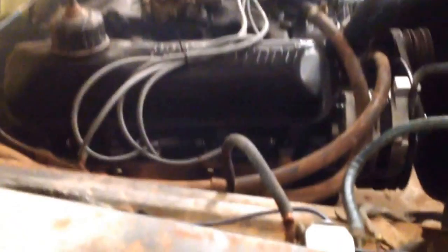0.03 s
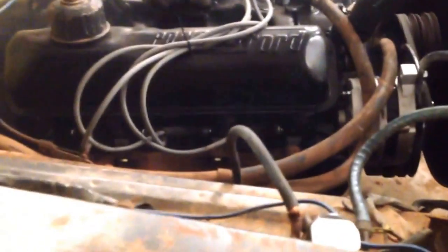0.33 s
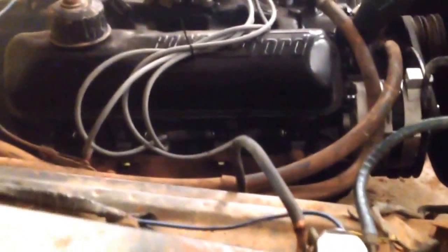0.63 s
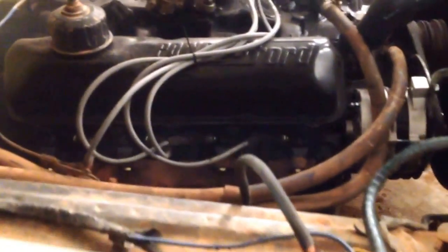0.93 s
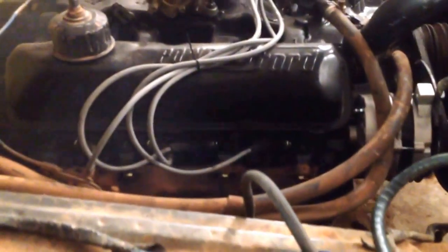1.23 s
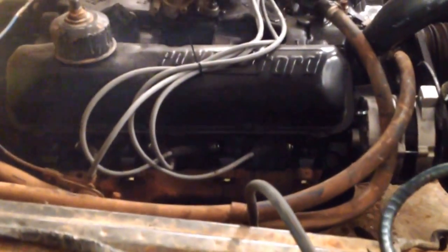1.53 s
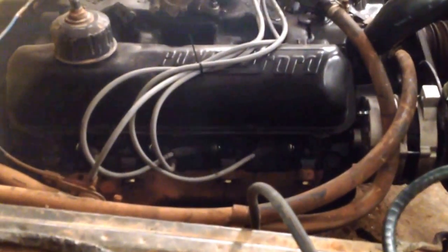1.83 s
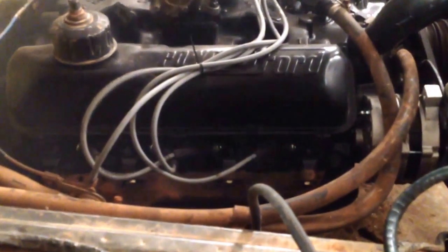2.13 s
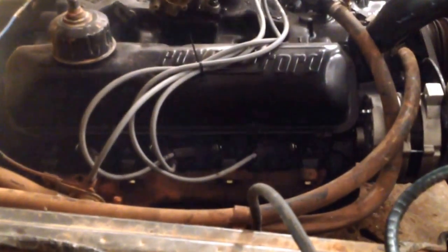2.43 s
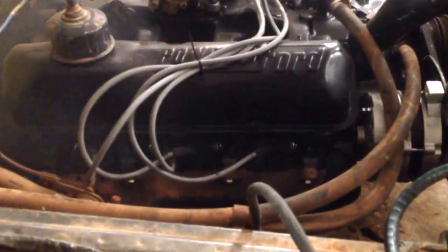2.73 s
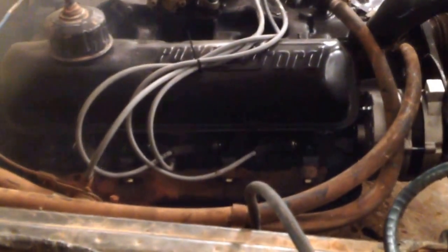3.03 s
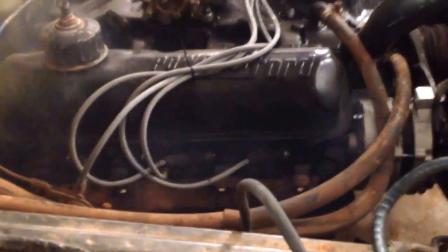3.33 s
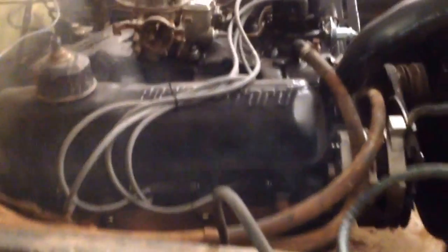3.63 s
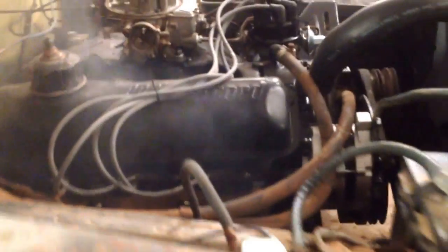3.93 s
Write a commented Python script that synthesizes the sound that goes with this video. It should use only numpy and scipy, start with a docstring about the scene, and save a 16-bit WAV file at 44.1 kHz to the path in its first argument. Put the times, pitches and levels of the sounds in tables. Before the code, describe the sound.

A petrol engine runs roughly, popping and missing, then dies, leaving a few faint knocks.

```python
"""Rough petrol engine in a workshop

One microphone, close to a truck's open engine bay. Each firing is a sharp puff of exhaust gas with
a low thud; even runs break up into single pops and misses, over the whir of fan, belts and valve gear.
The engine dies, the room rings out, and a few faint knocks follow, one on ringing metal."""
import sys
import numpy as np
from scipy import signal
from scipy.fft import rfft, irfft
from scipy.io import wavfile

SR = 44100
rng = np.random.default_rng(int(sys.argv[2]) if len(sys.argv) > 2 else 0)


def master_out(mix):
    """Clip the mix to full scale and print it as 16-bit PCM to the path in sys.argv[1]."""
    frames = np.transpose(np.atleast_2d(mix))
    ceiling = np.clip(frames, -1, 1)
    pcm = np.round(ceiling * 32767).astype(np.int16)
    wavfile.write(sys.argv[1], SR, pcm)


N = 176400
TIME = np.arange(N) / SR


def firings():
    """Every firing as a row: lone pops as the engine stumbles, then runs where no two puffs are alike."""
    # single pops: (time [s], level [dB], hiss [dB], thud [dB], length [s], bark pitch [Hz], bark [dB])
    pops = [(0.509, -11.5, 2.5, 0, 0.0028, 1376, -0.5), (0.558, -15, 2.5, 3.5, 0.0022, 1875, -4),
            (0.582, -13, 2.5, -4, 0.0047, 1610, -5.5), (0.615, -22.5, -8, 1, 0.013, 1900, -3.5),
            (0.638, -15.5, 4, 0.5, 0.0094, 1410, -1.5), (0.771, -15.5, 0, -6.5, 0.0087, 1650, -4),
            (0.802, -17, 3, 1, 0.011, 2000, -3), (0.846, -15, 3, 0.5, 0.0041, 1500, -3.5),
            (0.897, -10, -1, -4, 0.006, 2000, 1.5), (0.937, -14, 3.5, -10.5, 0.0096, 1417, 3),
            (0.985, -16, 0, -2, 0.0067, 1400, 2), (1.023, -10, 0, -1, 0.0082, 1652, -3.5),
            (1.055, -14, 5.5, -8.5, 0.0078, 2050, 1), (1.680, -29.5, -3, -6, 0.0029, 1450, 2),
            (1.740, -13, -0.5, -1.5, 0.0037, 1157, -0.5), (1.778, -15, -5.5, 1.5, .004, 1384, -6),
            (1.885, -10.5, -1, -5, 0.0062, 1700, 4), (1.923, -15.5, 4.5, -4, 0.0068, 1400, 2),
            (1.960, -11.5, 1.5, -4.5, 0.002, 2100, 0), (2.002, -9, 4.5, 1, 0.013, 1756, -7),
            (2.035, -14, 7.5, -1, 0.013, 1800, -8), (2.070, -10.5, -1, 2.5, 0.0097, 1430, -7),
            (2.099, -11, -1.5, -3.5, 0.011, 1483, -2.5), (2.151, -11, 1, 0.5, 0.0072, 1600, -2.5),
            (2.271, -13, 5.5, 0, 0.0069, 2400, -9), (2.345, -7, -3, -0.5, 0.0044, 1690, -4)]
    # even runs: (first puff [s], last puff [s], firing rate [1/s], level [dB], hiss [dB], thud [dB])
    runs = [(0.001, 0.219, 45.4, -13, 2, 0), (0.243, 0.462, 45.6, -13, 2.5, -1),
            (1.088, 1.141, 40, -9.5, 1, -1), (1.170, 1.192, 50, -12, 2.5, -0.5),
            (1.218, 1.258, 50, -10.5, 1, -0.5), (1.285, 1.369, 47, -12, 1.5, 0.5),
            (1.392, 1.537, 49, -12.5, 1.5, 3)]
    jitter_s, length_s, bark_hz, bark_db = .0014, .0055, 1722, -1.5
    rows = list(pops)
    for first, last, rate, db, hiss_db, thud_db in runs:
        for s in np.linspace(first, last, int(round((last - first) * rate)) + 1):
            late, strong, bright, long, high = np.clip(rng.standard_normal(5), -2, 2)
            rows.append((s + jitter_s * late, db + 1.1 * strong, hiss_db + 2.9 * bright, thud_db,
                         length_s * np.exp(.25 * long), bark_hz * np.exp(.28 * high), bark_db))
    return rows


def exhaust():
    """Each firing lets out a sputtering jet with a short hiss, a rising bark, a few rings and a thud."""
    # colours of the escaping gas, its hiss and the low thud: (frequency [Hz], relative level [dB])
    jet_colour = [(200, -31), (400, -10.5), (560, 0), (800, 1.5), (1050, -3), (1400, 6), (2300, 5),
                  (3300, 1), (4700, -0.5), (7000, -23), (15000, -10.5)]
    hiss_colour = [(2000, -16.5), (4000, 3), (5500, 0), (7000, 4), (10000, -0.5), (13500, 0), (16000, 0.5)]
    thud_colour = [(20, -23.5), (60, -28.5), (100, -18.5), (130, -9.5), (165, -1), (210, -3.5), (270, 3.5),
                   (330, -2.5), (380, -1.5), (470, -8), (900, -17.5)]
    attack_s, bark_rise_hz_per_s, thud_lag_s = .0038, 14000, .003
    jet, hiss, thud = noise(jet_colour), noise(hiss_colour), noise(thud_colour)
    sputter_db = 2.5 * noise([(100, 4), (600, 0.5), (2000, -29)])
    sputter = rms_one(from_db(sputter_db))
    out, thud_power, span = np.zeros(N), np.zeros(N), int(.25 * SR)
    for s, db, hiss_db, thud_db, length, bark_hz, bark_db in firings():
        start = max(int(s * SR) - span // 10, 0)
        at = slice(start, start + span)
        age = TIME[at] - s
        bark = resonance(bark_hz + bark_rise_hz_per_s * np.clip(age, -length, length))
        gas = from_db(-5) * jet[at] + from_db(bark_db - 8) * bark + from_db(-10) * gap_rings(span)
        puff = burst(age, length, attack_s, release_s=.0073) * gas
        hiss_envelope = burst(age, .56 * length, attack_s=.0051, release_s=.0045)
        puff += hiss_envelope * from_db(hiss_db - 4.5) * hiss[at]
        out[at] += from_db(db) * (puff * sputter[at] + from_db(thud_db) * boom(age))
        thud_envelope = burst(age - thud_lag_s, length, attack_s, release_s=.012)
        thud_power[at] += (from_db(db + thud_db - 11.5) * thud_envelope) ** 2
    return out + np.sqrt(thud_power) * thud


def gap_rings(samples, low_hz=698.1, high_hz=3925):
    """Each puff excites its own four resonances of the gap it escapes through."""
    pitches = low_hz * (high_hz / low_hz) ** rng.random(size=4)
    return rms_one(sum(resonance(np.full(samples, hz)) for hz in pitches))


def boom(age, lead_s=.002, uneven_db=2):
    """The pressure pulse of one firing rings the pipe and the bay."""
    # low modes of pipe and bay: (frequency [Hz], level [dB], t60 [s])
    modes = [(120, -26, .06), (170, -20, 0.09), (235, -9, 0.033), (273, -12, 0.09), (376.5, -12, 0.039),
             (797.3, -15, 0.075)]
    t = np.maximum(age + lead_s, 0)
    out = np.zeros(len(t))
    for k, (hz, db, t60) in enumerate(modes):
        envelope = from_db(db + uneven_db * rng.standard_normal() - 60 * t / t60)
        out += envelope * (-1) ** k * np.sin(2 * np.pi * hz * t)
    return out


def whir():
    """Fan, belts and valve gear whir while the crank turns, and fade as the engine dies."""
    # loudness of the turning parts: (time [s], level [dB])
    turning = [(0, -24.5), (.5, -24), (.7, -32), (1.1, -27.5), (1.5, -35), (1.7, -33), (2.2, -31),
               (2.4, -33), (2.55, -51.5), (2.75, -57), (3.0, -73.5), (4, -92)]
    # their colour: (frequency [Hz], relative level [dB])
    colour = [(30, -27.5), (80, -10.5), (170, 9.5), (300, 1.5), (600, -5), (1200, -3.5), (2200, -3),
              (4500, -11), (8000, -15), (15000, -30.5)]
    return level(turning) * noise(colour)


def knocks():
    """Dull knocks with a tick on top; each can set a metal part ringing."""
    # knocks after the last firing: (time [s], level [dB], decay [s], treble [dB], metal ring [dB])
    hits = [(2.721, -59, .01, 15, -30), (2.778, -42.5, 0.018, 3, -28), (3.477, -47.5, 0.041, -3.5, -22),
            (3.578, -58, .005, 11.5, -20), (3.598, -52.5, 0.061, -8.5, -1), (3.858, -56, .05, -10, -25),
            (3.92, -58.5, 0.017, -1, -27)]
    # colours of the dull body and the tick: (frequency [Hz], relative level [dB])
    body_colour = [(25, -42), (80, -24), (170, 3), (380, 7), (550, -8.5), (800, -2), (1500, -16),
                   (4000, -28), (15000, -50)]
    tick_colour = [(500, -25), (1200, -4), (3000, 6), (6000, -7), (10000, -6.5), (14000, -7)]
    # modes of the metal part: (frequency [Hz], level [dB], t60 [s])
    metal = [(460, 1.5, 0.8), (707, 4, 0.38), (910, 5, 0.17), (1002, -1, 0.2), (1730, -13.5, 0.35),
             (2046, -13, 0.27)]
    body, tick, out = noise(body_colour), noise(tick_colour), np.zeros(N)
    for s, db, decay, treble_db, ring_db in hits:
        age = np.maximum(TIME - s, 0)
        ring = sum(from_db(mode_db - 60 * age / t60) * np.sin(2 * np.pi * hz * age)
                   for hz, mode_db, t60 in metal)
        envelope = burst(TIME - s, length_s=.0015, attack_s=.0017, release_s=decay)
        knock = envelope * (body + from_db(treble_db - 5.5) * tick)
        out += from_db(db) * (knock + from_db(ring_db) * ring)
    return out


def engine_bay(x):
    """Sheet metal close to the microphone adds a few quick echoes."""
    # echoes off the bonnet and wings: (delay [s], level [dB])
    echoes = [(.0037, -24), (.0061, -21.5), (0.012, -16), (0.0182, -20)]
    return x + sum(from_db(db) * np.pad(x, (int(s * SR), 0))[:N] for s, db in echoes)


def workshop(x, near_db=-20, near_t60_s=.33):
    """The room answers with a short flurry from the near walls and a tail that dies band by band."""
    # colour of the tail: (frequency [Hz], band level [dB])
    colour = [(60, -15), (170, -8), (300, -8), (420, -11), (600, -21), (1000, -19), (2000, -11),
              (4500, -13.5), (8000, -16), (15000, -21.5)]
    # how long the room rings: (frequency [Hz], t60 [s])
    ring_times = [(100, 1.6), (250, 0.37), (600, 0.85), (2000, 0.69), (4500, 1.3), (8000, .7),
                  (15000, 0.56)]
    t, hz = TIME[:N // 2], np.arange(N // 4 + 1) * SR / (N // 2)
    white, edges_hz = rfft(rng.standard_normal(len(t))), np.geomspace(40, 18000, 15)
    near = rng.standard_normal(len(t)) * from_db(-60 * t / near_t60_s) * (1 - np.exp(-t / 0.0027))
    response = from_db(near_db) * near / np.linalg.norm(near)
    for low, high in zip(edges_hz, edges_hz[1:]):
        centre = np.sqrt(low * high)
        band = irfft(white * (hz >= low) * (hz < high), len(t))
        fade = from_db(-60 * t / at_hz(ring_times, centre)) * (1 - np.exp(-t / 0.005))
        response += from_db(at_hz(colour, centre)) * fade / np.linalg.norm(fade) * band
    return signal.fftconvolve(x, response)[:N]


def high_hiss():
    """A thin hiss comes and goes between the pops and fades with the engine."""
    # swells of the hiss: (time [s], level [dB])
    swells = [(0, -29), (.55, -34), (.72, -38.5), (.83, -33), (.87, -57.5), (1.1, -29.5), (1.5, -28.5),
              (1.62, -39), (1.8, -33), (1.87, -44.5), (2.17, -37.5), (2.4, -34), (2.48, -50.5), (2.59, -46),
              (2.64, -77), (2.9, -86), (3.2, -90)]
    # its colour: (frequency [Hz], relative level [dB])
    colour = [(2500, -15.5), (4500, -2), (7000, -0.5), (10500, -4), (12500, -4), (14500, -2.5),
              (16000, -6.5)]
    return level(swells) * noise(colour)


def rustle():
    """A faint rustle around the later knocks."""
    # swells of the rustle: (time [s], level [dB])
    swells = [(3.2, -94.5), (3.42, -64.5), (3.52, -66), (3.62, -58), (3.7, -78), (3.78, -72), (3.87, -63.5),
              (4, -81)]
    # its colour: (frequency [Hz], relative level [dB])
    colour = [(50, -30), (400, -8.5), (1000, 2.5), (2000, 5.5), (3500, -7.5), (6500, -4), (10500, -15),
              (13500, -2.5), (15500, -8.5)]
    return level(swells) * noise(colour)


def room_tone():
    """The low, quiet air of the workshop, heard once the engine has stopped."""
    # slight drift of the room tone: (time [s], level [dB])
    drift = [(0, -62), (3.25, -63.5), (3.45, -60.5), (3.62, -59), (3.75, -60.5), (4, -59.5)]
    # its colour: (frequency [Hz], relative level [dB])
    colour = [(25, -33.5), (70, -22.5), (120, -9), (170, 5.5), (260, -5.5), (400, -10.5), (800, -17.5),
              (2000, -22.5), (5000, -31.5), (8000, -30), (11000, -40), (15000, -35.5)]
    return level(drift) * noise(colour)


def burst(age, length_s, attack_s, release_s):
    """A quick swell, a hold centred on age zero, an exponential release."""
    early = np.clip((-age - length_s / 2) / attack_s, 0, 10)
    late = np.clip((age - length_s / 2) / release_s, 0, 30)
    return np.exp(-early ** 2 - late)


def resonance(hz, width_hz=150):
    """Noise in a narrow resonance that follows a pitch curve, rms 1."""
    r = np.exp(-np.pi * width_hz / SR)
    real, imaginary = signal.lfilter([1], [1, -2 * r, r * r], rng.standard_normal((2, len(hz))))
    phase = 2 * np.pi * np.cumsum(hz) / SR
    return rms_one(real * np.cos(phase) + imaginary * np.sin(phase))


def noise(colour):
    """Noise with a spectrum of (frequency [Hz], relative level [dB]) rows, rms 1."""
    hz = np.arange(N // 2 + 1) * SR / N
    random_phases = np.exp(2j * np.pi * rng.random(len(hz)))
    return rms_one(irfft(from_db(at_hz(colour, hz)) * random_phases, N))


def level(points):
    """Gain over time from (time [s], level [dB]) rows."""
    return from_db(np.interp(TIME, *np.transpose(points)))


def at_hz(points, hz):
    """Read a table on a log-frequency axis."""
    f, value = np.transpose(points)
    return np.interp(np.log(np.maximum(hz, 1)), np.log(f), value)


def from_db(db):
    """Decibels to gain."""
    return 10 ** (np.asarray(db) / 20)


def rms_one(x):
    """Scale to unit rms."""
    return x / np.sqrt(np.mean(x ** 2) + 1e-20)


def scene():
    """The engine close up and the knocks, with the workshop ringing behind them, in mono."""
    direct = engine_bay(exhaust()) + whir() + knocks()
    faint = high_hiss() + rustle() + room_tone()
    return (direct + workshop(direct) + faint)[None]


def record(dry, cutoff_hz=15500, overload=.65):
    """The loudest peaks at the microphone are flattened; the top is cut before and after."""
    top_cut = signal.firwin(511, cutoff_hz, window="blackman", fs=SR)
    heard = signal.fftconvolve(dry, top_cut[None], "same")
    flattened = heard / (1 + (heard / overload) ** 4) ** (1 / 4)
    return signal.fftconvolve(flattened, top_cut[None], "same")


dry = scene()
out = record(dry)
master_out(out)
```